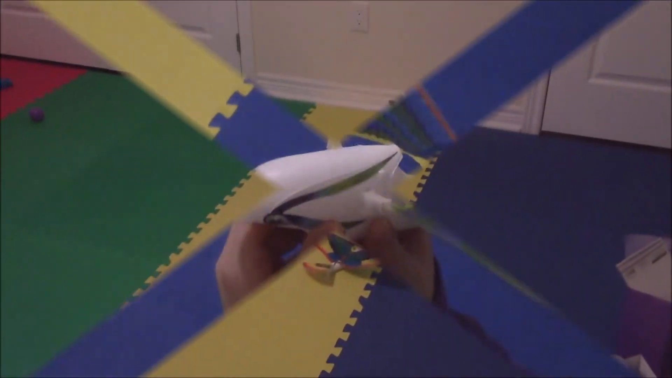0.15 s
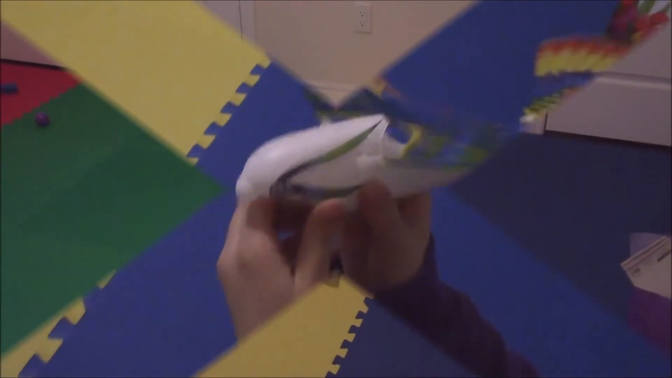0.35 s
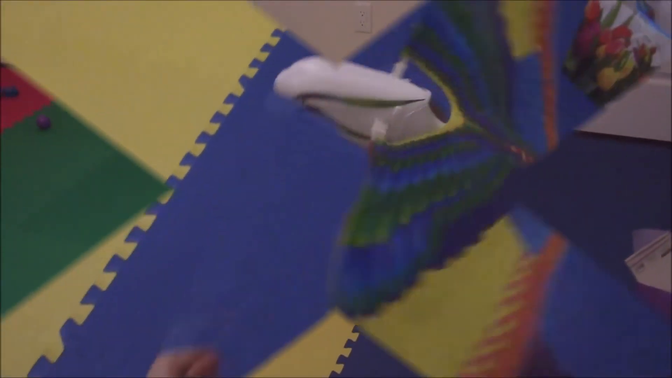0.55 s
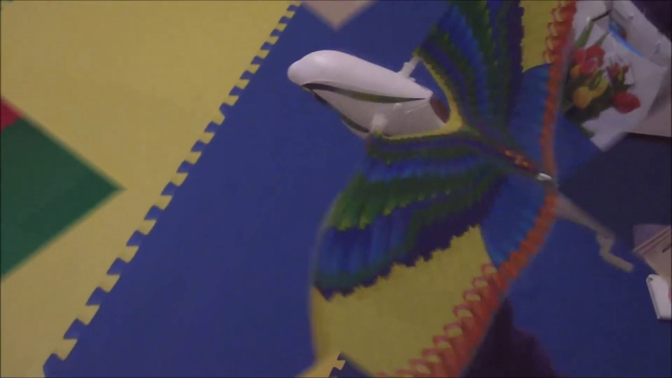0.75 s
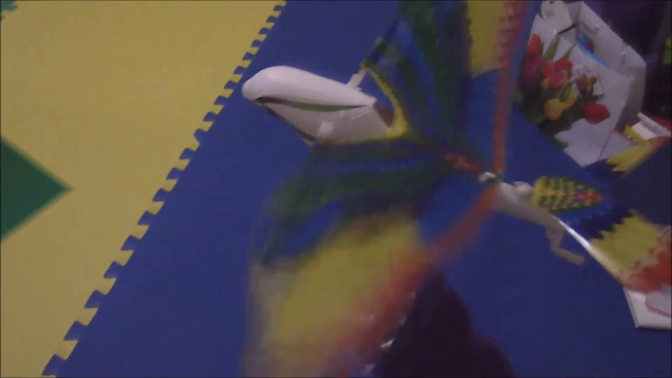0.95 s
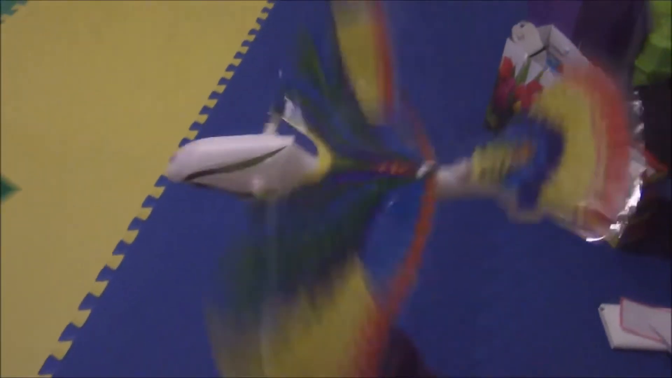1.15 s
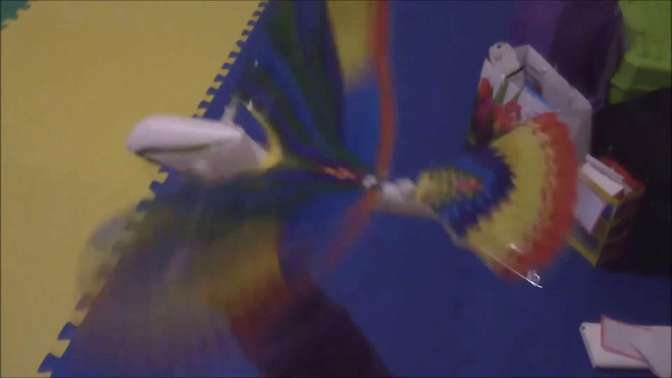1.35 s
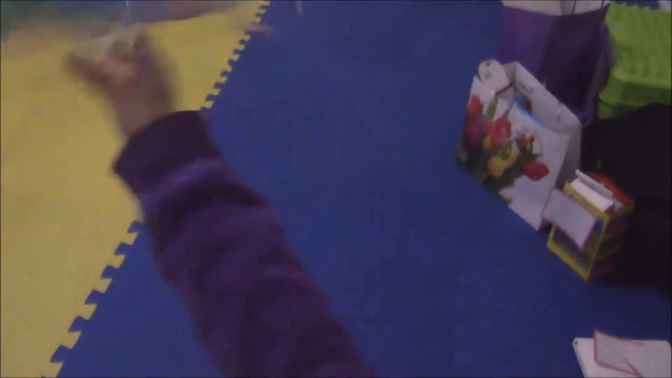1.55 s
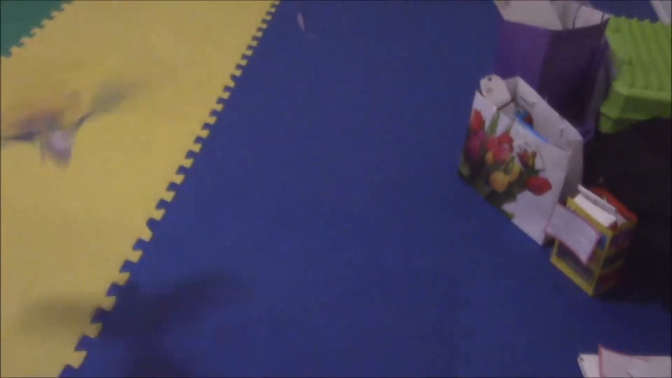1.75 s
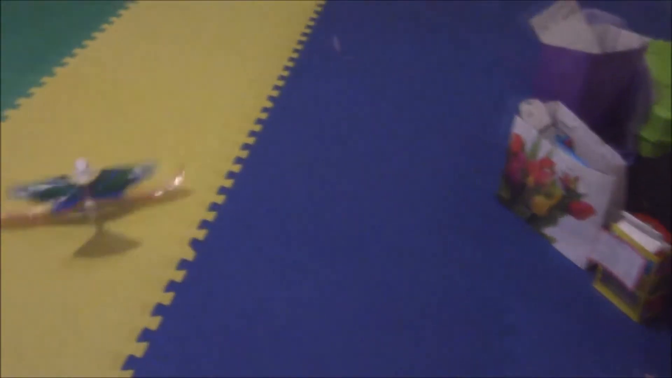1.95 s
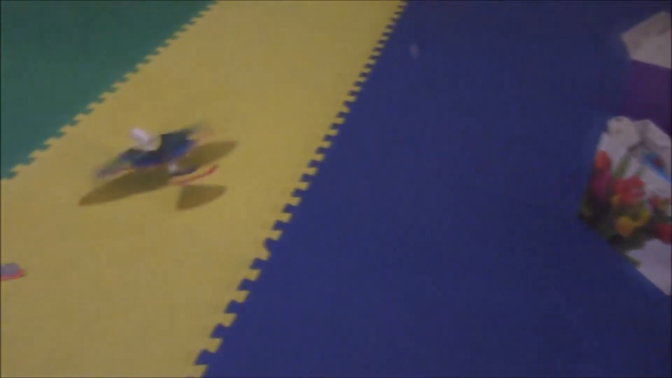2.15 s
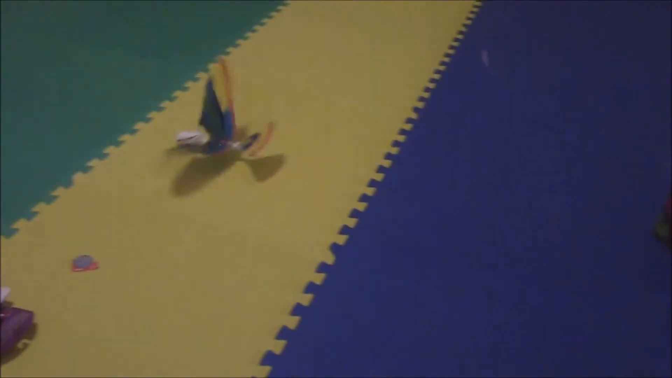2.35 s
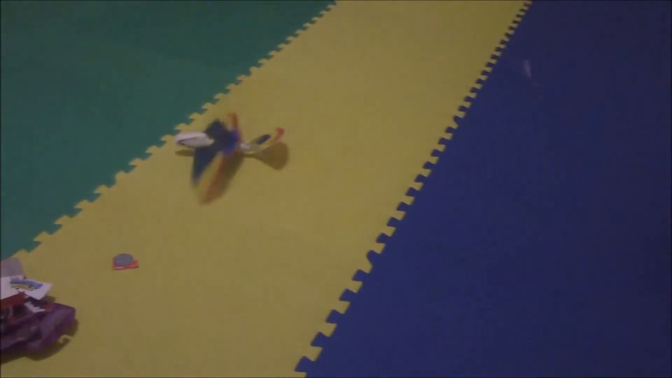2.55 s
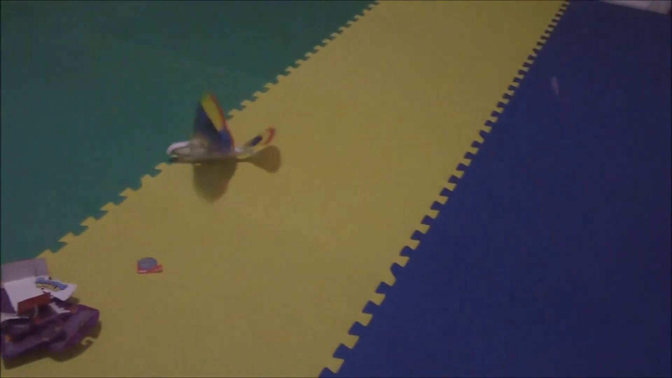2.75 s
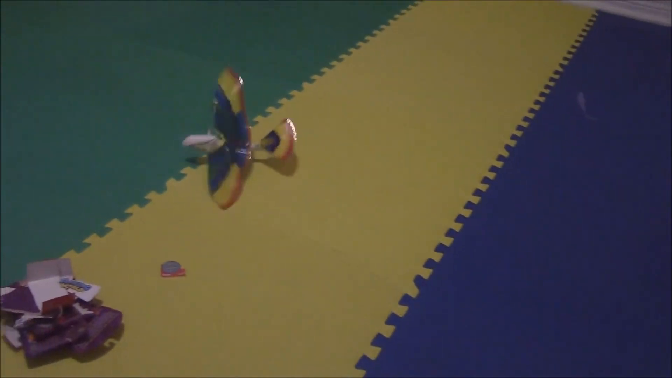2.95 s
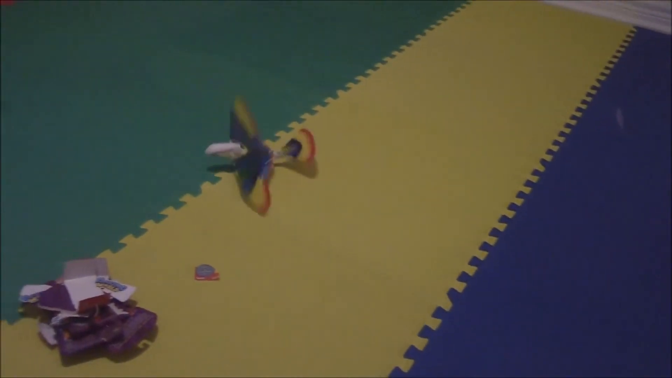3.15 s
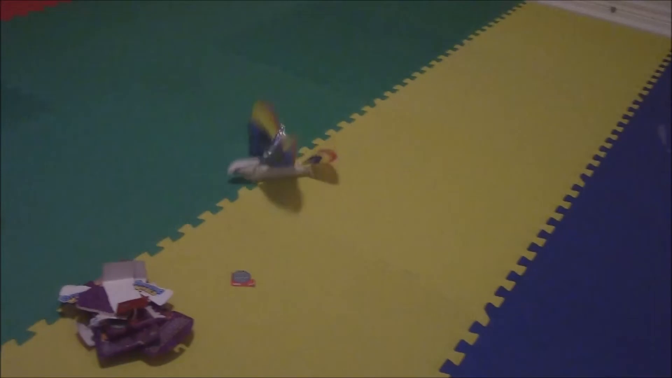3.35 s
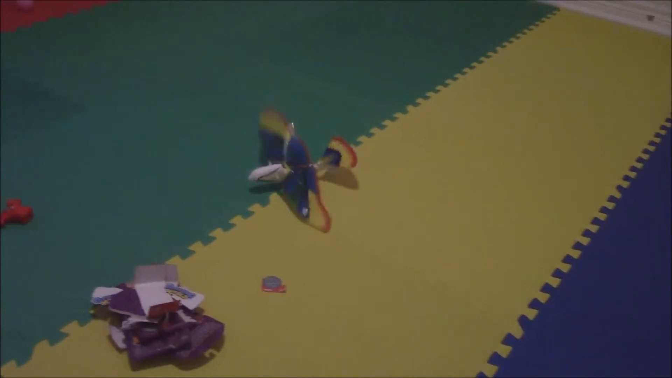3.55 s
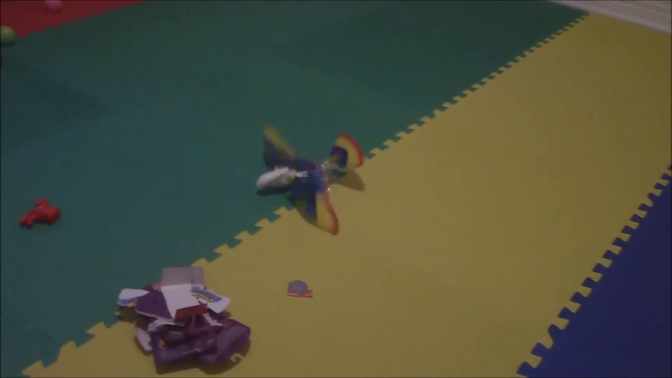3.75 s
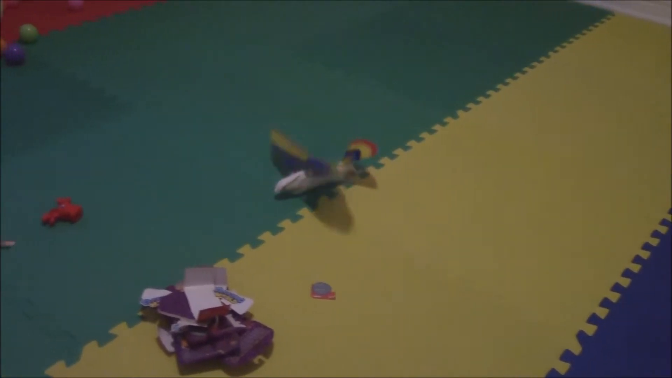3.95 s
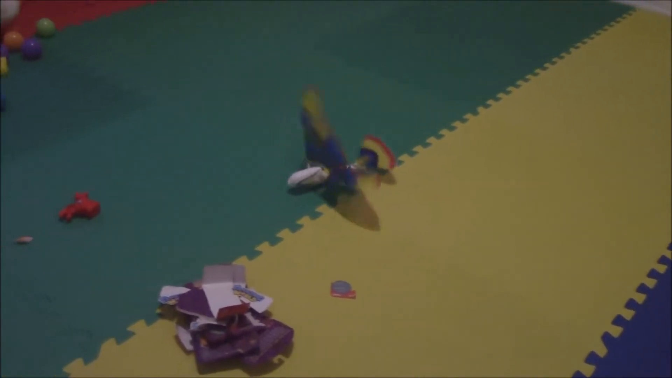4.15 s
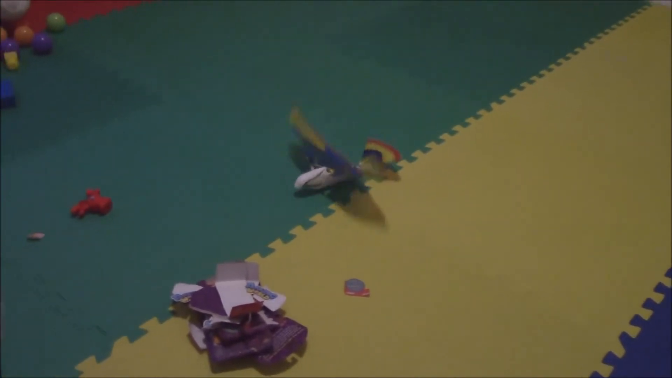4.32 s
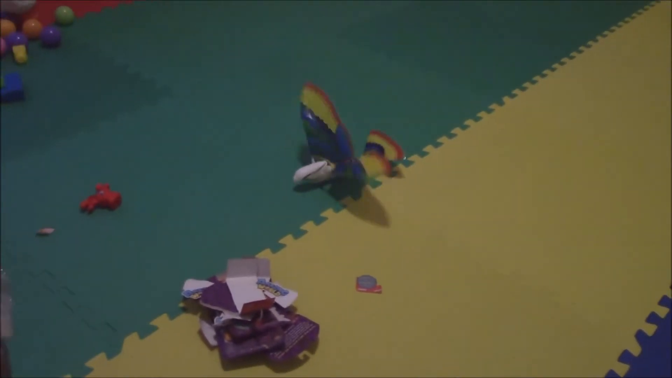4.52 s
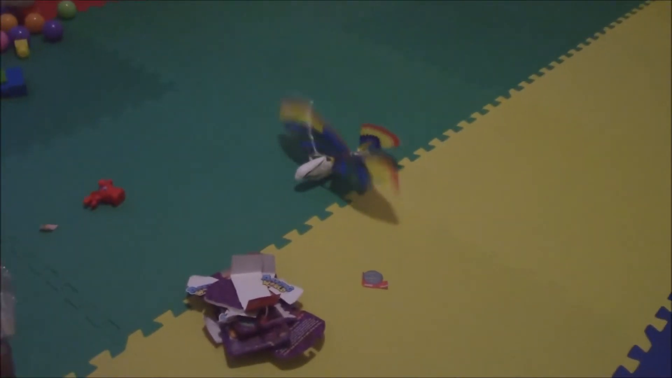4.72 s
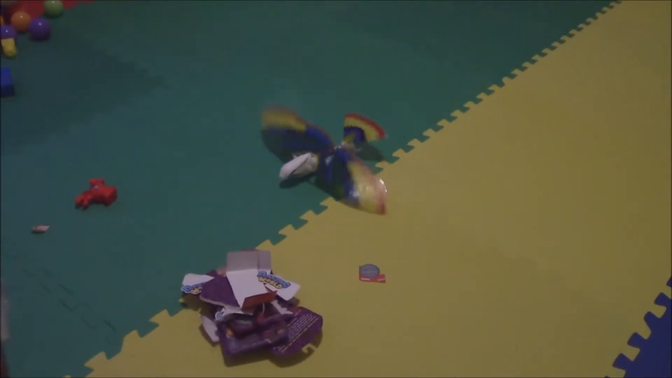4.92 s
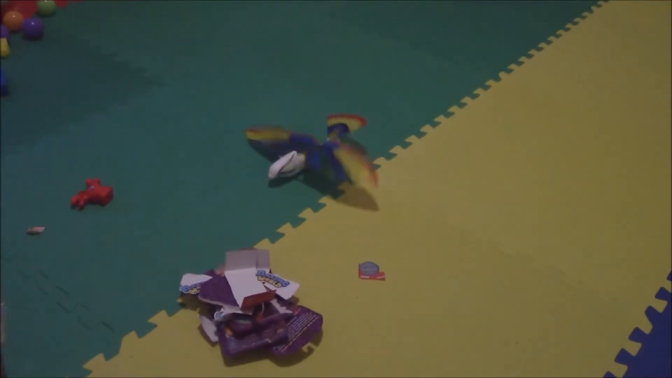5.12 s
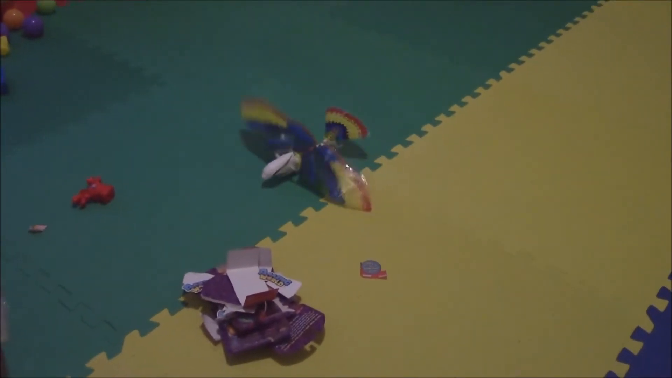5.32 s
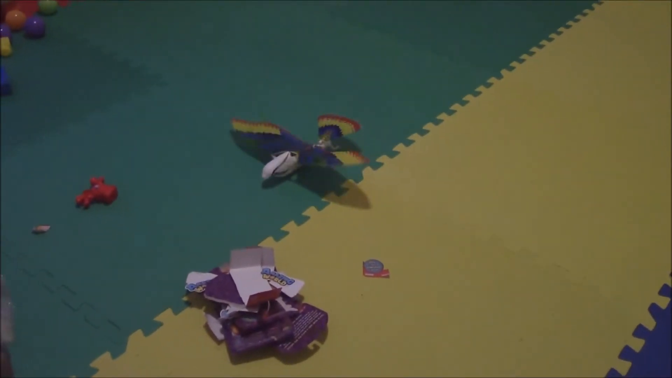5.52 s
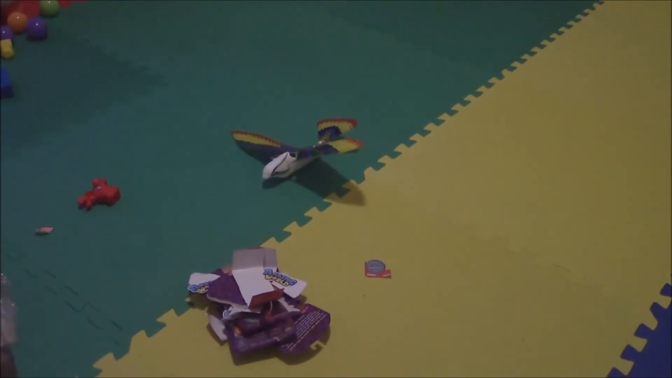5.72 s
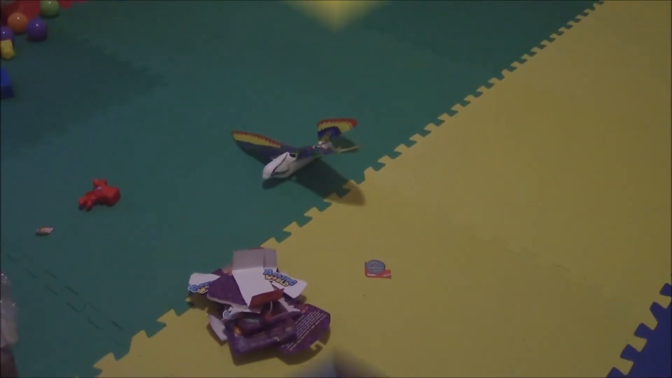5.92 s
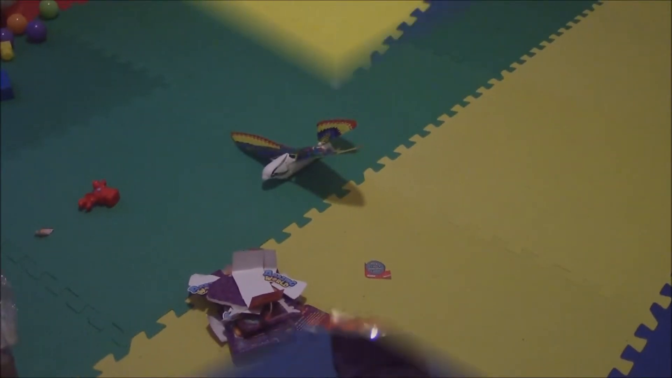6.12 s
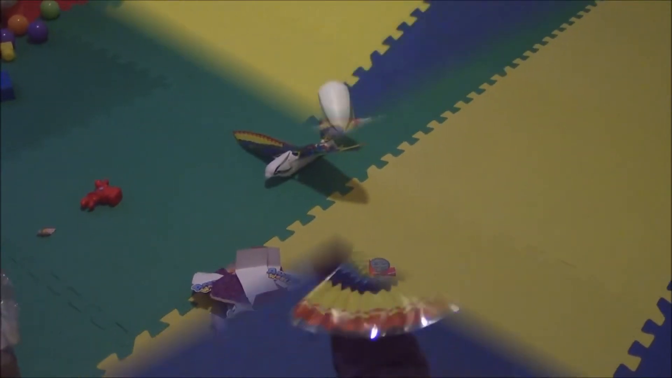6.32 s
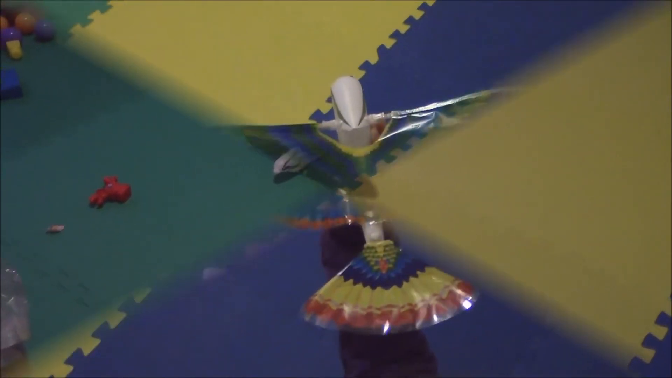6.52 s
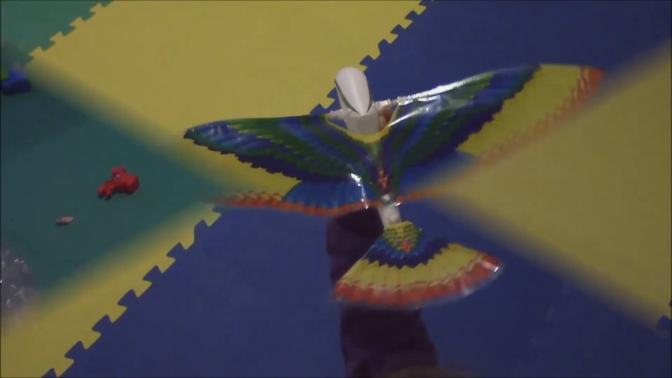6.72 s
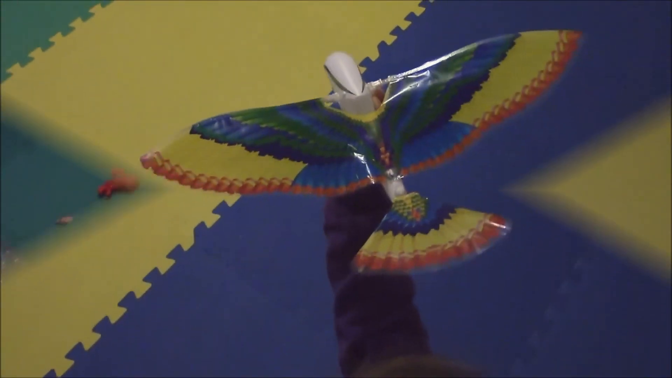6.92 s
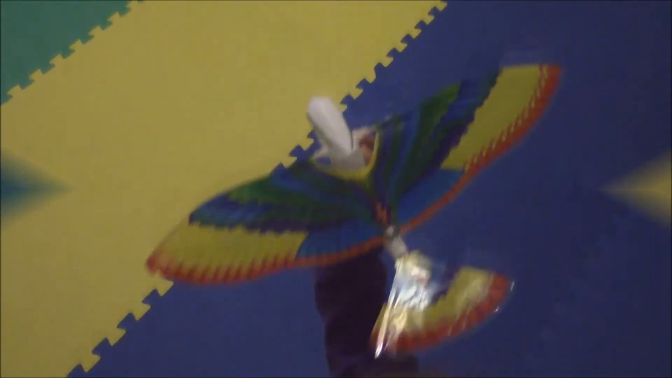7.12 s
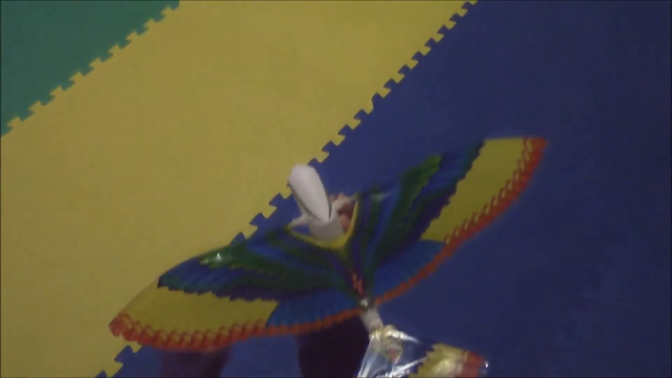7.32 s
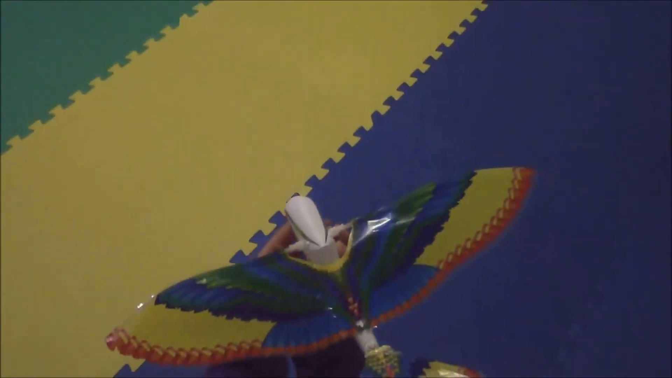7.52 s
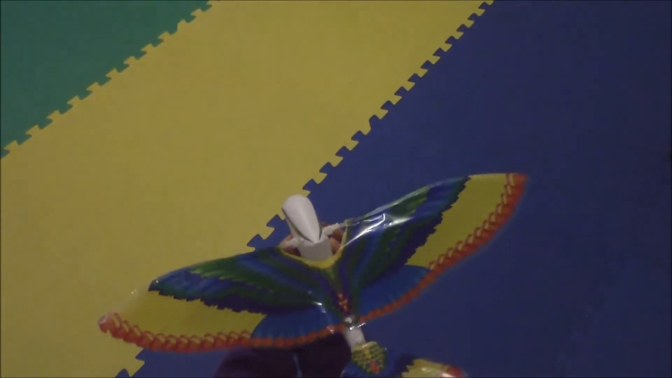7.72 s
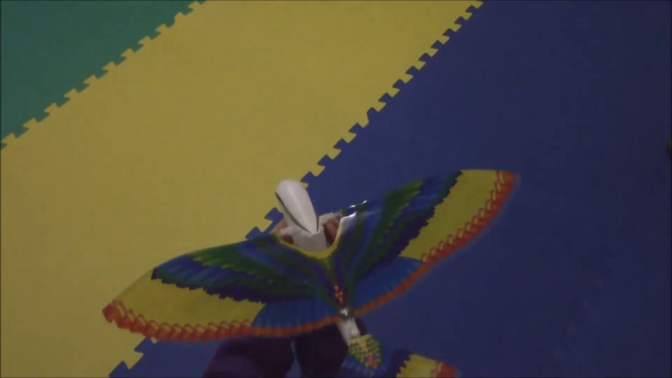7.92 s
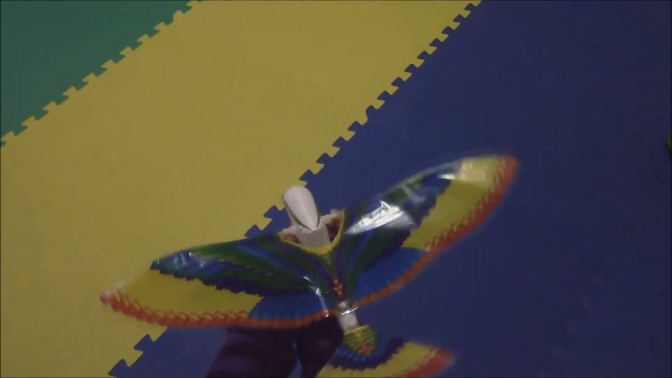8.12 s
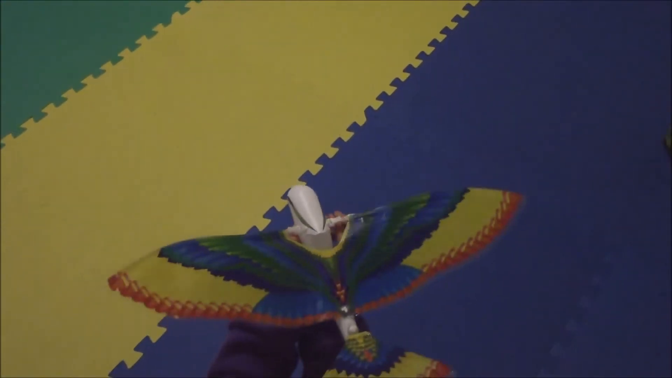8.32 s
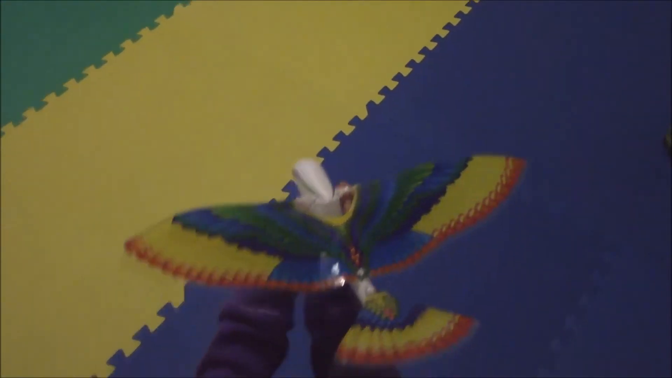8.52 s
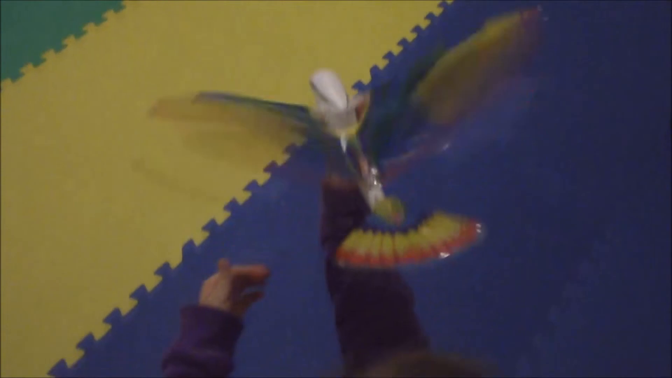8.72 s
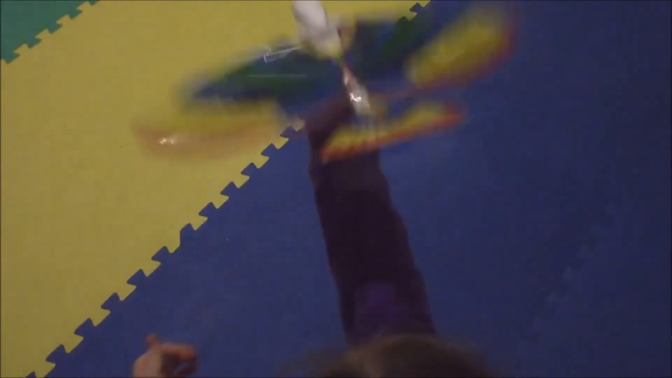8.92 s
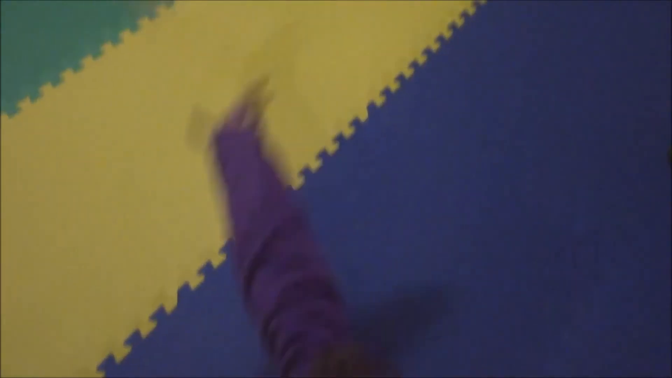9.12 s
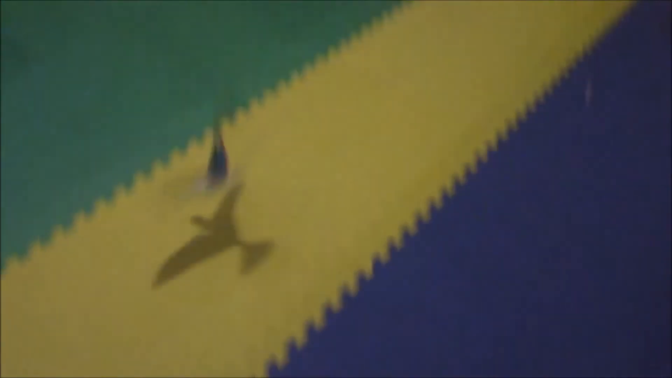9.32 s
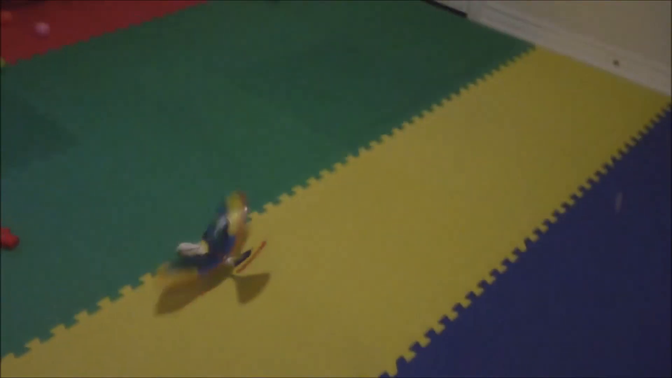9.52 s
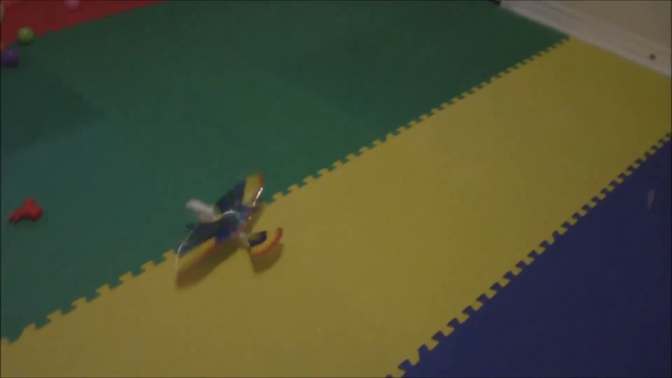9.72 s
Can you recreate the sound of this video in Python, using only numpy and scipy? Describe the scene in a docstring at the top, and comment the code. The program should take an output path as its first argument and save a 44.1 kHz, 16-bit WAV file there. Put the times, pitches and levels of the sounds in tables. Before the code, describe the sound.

Close to the microphone, thin plastic film crinkles in the hands. A rubber-driven toy bird is released and its wings clatter about twenty snaps a second, moving away and slowing to an uneven flapping on a foam mat. It stops; small plastic clicks and a sudden fading hiss follow. More light crinkling, then a second launch rattles off and is still flapping at the end. Bare, echoing room with soft hum.

```python
"""Bare, echoing playroom: a rubber-driven toy bird beats plastic-film wings in two flights.
Each stroke is a noise snap with a decaying sine ring, a knock of body resonances, a puff of air and rattling film.
Film crinkles (filtered crackle, noise creases) and is rubbed (bands of hiss); small plastic ticks are decaying modes.
Below lie a soft room hum (coloured noise) and a hiss that starts at once and fades."""
import sys
import numpy as np
from scipy import signal
from scipy.fft import rfft, irfft, next_fast_len
from scipy.io import wavfile
from scipy.ndimage import uniform_filter1d

SR = 44100
rng = np.random.default_rng(int(sys.argv[2]) if len(sys.argv) > 2 else 0)


def invert_db(x):
    """Field ratio 10**(x/20) for x, a level in decibels (scalar or array-like)."""
    u = np.asarray(x, float) / 20
    return 10 ** u


def master_out(mix):
    """Clip the mix to full scale and print it as 16-bit PCM to the path in sys.argv[1]."""
    frames = np.transpose(np.atleast_2d(mix))
    ceiling = np.clip(frames, -1, 1)
    pcm = np.round(ceiling * 32767).astype(np.int16)
    wavfile.write(sys.argv[1], SR, pcm)


N = 434826
T = np.arange(N) / SR

# room hum, stepwise: start_s, level_db, treble_db
HUM_STEPS = [(0, -42.5, 9.5), (1.002, -54, 8), (6.349, -40.5, 7.5)]
# hum spectrum: pitch_hz, level_db
HUM_SPECTRUM = [(70, -14.5), (140, -3), (250, 1), (500, -3.5), (1200, -16.5), (3300, -29), (7000, -44.5),
                (11000, -55)]
# room decay: pitch_hz, t60_s
ROOM_T60 = [(120, .2), (300, .58), (900, .95), (3200, .85), (6400, .74), (9500, .58), (15000, .35)]
# standing waves of the room: pitch_hz
ROOM_MODES_HZ = [150.3, 233.5, 295, 347.7, 417]
# stereo side of a sound, before its side level: pitch_hz, level_db
SIDE_SPECTRUM = [(40, -9.5), (150, -31), (2000, -25.5), (4000, -16), (8000, -12.5), (15000, -21)]
# soft rubbing near the bird: start_s, length_s, centre_hz, level_db
RUBS = [(8.09, 0.14, 1560, -43), (0.14, 0.21, 940, -43), (0.556, 0.076, 1020, -38)]
# small plastic ticks: start_s, level_db, left_minus_right_db, push_s
TICKS = [(5.913, -10.5, -4, 0.0021), (6.2634, -6.5, -5, 0.00021), (6.279, -11.5, 2, 0.0019),
         (6.542, -12.5, 3, 0.00041), (6.567, -7, 3, 0.00079)]
# modes of a tick: pitch_hz, level_db, t60_s
TICK_MODES = [(1530, 14, 0.012), (2560, 16.5, 0.012), (3580, 4.5, 0.0055), (4530, 12, 0.0056),
              (6500, 4, 0.0054)]
# bird held, idle crinkle: start_s, end_s, level_db
HELD = [(0, 0.974, -46), (7.023, 8.724, -50)]
# fingers squeeze the film: start_s, hold_s, level_db
SQUEEZES = [(0.384, 0.11, -33.5), (0.609, 0.012, -28), (7.14, 0.033, -40.5), (7.899, 0.015, -35),
            (8.229, 0.06, -37.5), (8.352, 0.04, -35), (8.484, 0.029, -40)]
# single film creases, faint to sharp: start_s, level_db
CREASES = [(0.3975, -21), (0.4226, -12.5), (0.4489, -14.5), (0.6419, -18), (0.6734, -8.5), (0.814, -29),
           (0.956, -49), (0.975, -39.5), (5.648, -58), (5.722, -37), (6.5886, -28), (7.156, -32),
           (7.928, -22.5), (7.455, -36), (7.868, -31), (8.265, -15), (8.337, -26), (8.622, -28),
           (8.494, -17.5), (7.35, -28.5)]
# crinkle spectrum: pitch_hz, level_db
CRINKLE_SPECTRUM = [(350, -34.5), (600, 3), (3630, 2), (5330, -4), (9360, -6.5), (12800, -21.5),
                    (16000, -34)]
# flights: release_s, mat_landing_s, turn_swap_after_landing
FLIGHTS = [(1.0, 1.7, 0), (8.75, 9.33, 1)]
# wing strokes, two alternating kinds, swapped after the second landing: start_s, snap_db
STROKES = [(1.007, 9), (1.029, -3), (1.062, 0), (1.0978, 0), (1.138, 6), (1.1824, 1), (1.2253, 3.5),
           (1.2699, 2.5), (1.316, 0), (1.3646, 0.5), (1.414, 2), (1.4653, 1.5), (1.5194, 0), (1.568, 0.5),
           (1.6187, 4.5), (1.671, -8.5), (1.7165, -2), (1.7732, -8), (1.817, -3), (1.8762, -8),
           (1.9186, -1), (1.9833, -7), (2.0433, -3.5), (2.099, -11), (2.1603, -3.5), (2.2198, -8),
           (2.2837, -3.5), (2.341, -10.5), (2.409, -0.5), (2.484, -12), (2.5438, -5.5), (2.618, -4),
           (2.6827, -2.5), (2.758, -11), (2.8236, 0), (2.901, -5.5), (2.966, 1), (3.0448, -8), (3.111, -1),
           (3.1852, -3.5), (3.245, 4.5), (3.327, -8), (3.3896, 0.5), (3.4694, -7), (3.5369, 1.5),
           (3.6323, -7.5), (3.703, -2.5), (3.794, -10.5), (3.8603, 0), (3.9554, -11.5), (4.0325, 0.5),
           (4.1397, -2.5), (4.211, -1), (4.3174, -2), (4.39, -1), (4.4783, -2.5), (4.5576, -1), (4.656, -5),
           (4.7311, 2), (4.8137, -6.5), (4.9049, -4.5), (4.9975, -3.5), (5.0963, -2), (5.2123, -9),
           (5.2972, -1.5), (5.416, -16.5), (8.756, -2.5), (8.7748, -1), (8.832, 2.5), (8.8962, -4.5),
           (8.9563, -2), (9.0267, 0), (9.0747, -2), (9.1365, 0), (9.19, -1), (9.2444, -1.5), (9.306, -9.5),
           (9.3525, -4.5), (9.427, -3.5), (9.4842, -3.5), (9.536, -4), (9.604, 1), (9.6688, 1.5),
           (9.733, 9), (9.8015, 6)]
# the bird as heard: time_s, stroke_force_db, nearness_db, hollow_level_db
PLACE = [(0.999, -17, -4.5, 6), (1.3, -20.5, 5, -14), (1.6, -22.5, 1.5, 4), (1.9, -16.5, -10.5, 2),
         (2.601, -16.5, -10.5, -2), (3.301, -16.5, -12.5, 1.5), (3.85, -14, -11.5, 4),
         (4.101, -15, -14.5, -8.5), (5.3, -14, -12.5, -1.5), (8.7, -14, 2, -13.5), (9.2, -11, -5.5, -8.5),
         (9.5, -9, -5.5, -6), (9.8, -12, -17, -4.5)]
# narrow resonances, drifting as the bird turns: time_s, lower_hz, upper_hz, lower_minus_upper_db
HOLLOWS = [(1.0, 790, 914, -3), (2.0, 730, 896, -9), (2.8, 685, 914, 1), (3.85, 650, 891, -8),
           (4.2, 643, 962, 1), (5.399, 700, 971, -3), (8.7, 760, 1049, 1.5), (9.798, 705, 1027, 2.5)]
# hollow body: pitch_hz, width_hz, level_db
BODY_MODES = [(461, 110, -12.5), (777, 303, -4), (1061, 237, -7.5), (1384, 180, -8), (2096, 780, -11.5)]
# body bumps the mat: start_s, level_db
BUMPS = [(9.414, 1), (9.623, 3)]
# film spectrum: pitch_hz, level_db
FILM_SPECTRUM = [(590, -27), (1000, 0), (1710, -9), (3050, -7.5), (5020, -9.5), (9940, -10), (13100, -14.5),
                 (16000, -33)]

MIC_HISS_DB = -24  # against the hum
WASH_AT_S, WASH_DB, WASH_DECAY_S = 6.349, -42.5, 0.81
EARLY_SHARE, LATE_DB = .3, 0.5  # fast part: share of t60; slow tail: level against it
NEAR_SIDE_DB = -7.5  # direct sound
TICK_BRIGHT = 0.49  # harder ticks ring more upper modes: dB per dB and octave
TICK_TAIL_DB, TICK_TAIL_S = -1.5, 0.0092
SQUEEZE_RISE_S, SQUEEZE_FALL_S = .02, .04
SMALL_CREASES_PER_S, SMALL_CREASE_DB = 45, 7
# film ring: downstrokes, free upstrokes, upstrokes damped by the mat
DOWN_HZ, UP_HZ, UP_MAT_HZ = 2136, 3076, 1840
FRESH_RISE, FRESH_S = .3, .09  # pitch rise as a share, its decay after release
RING_SCATTER = 0.11  # share of pitch
RING_S, UP_RING_S, FREE_RING_DB = .0013, .0018, 4  # free upstrokes ring longer and louder
SNAP_S, SNAP_DB, UP_SNAP_DB = .002, -9, -2
BRIGHT_SCATTER_DB = 2.5  # stroke to stroke
TREBLE_PER_NEAR_DB, TREBLE_DB = 0.19, 3  # a near bird is brighter
DOWN_KNOCK_DB = 1  # downstrokes in the air knock harder
PUFF_UP_DB = -5  # upstrokes push less air
SLAP_DB, SLAP_UP_DB, SLAP_S = -3, -2, 0.0012
PAPER_DB, PAPER_S = -25, 0.036  # rattly tail of a downstroke's slap
HOLLOW_WIDTH_HZ = 50
STROKE_HOLLOW_DB, STROKE_HOLLOW_S = -9.5, 0.069
THIRD_HOLLOW, THIRD_DB = 1.55, -8  # weaker resonance: multiple of the upper pitch, level
UP_FILM_DB = 1.5  # upstrokes rustle more
SWISH_HZ, SWISH_WIDTH_HZ, SWISH_DB, SWISH_PER_NEAR_DB = 12500, 8000, -6, 0.5
SWISH_LEAD_S, SWISH_LEAD_DB, SWISH_S, SWISH_DOWN_DB = .013, -3, .012, -5
SWEEP_DB, SWEEP_S = -10, .05  # hiss lingering between strokes


def colour(x, points):
    """Filter by a curve of (Hz, dB) points."""
    hz, db = np.transpose(points)
    f = np.maximum(np.fft.rfftfreq(x.shape[-1], 1 / SR), 1)
    return irfft(rfft(x) * invert_db(np.interp(np.log(f), np.log(hz), db)), x.shape[-1])


def unit(x):
    """Scale to rms 1."""
    return x / np.sqrt(np.mean(x ** 2))


def ring(x, hz, width_hz):
    """One resonance, gain 1 at its centre."""
    return signal.lfilter(*signal.iirpeak(hz, hz / width_hz, fs=SR), x)


def noise():
    """White noise of the full length."""
    return rng.standard_normal(N)


def add(track, s, sound):
    """Lay a sound into a track at a time."""
    i = int(s * SR)
    track[..., i:i + sound.shape[-1]] += sound[..., :N - i]


def bursts(times, gains, decay_s):
    """Envelope that jumps at each time and dies away exponentially."""
    kicks = np.bincount((np.asarray(times) * SR).astype(int), gains, N)
    return signal.lfilter([1], [1, -np.exp(-1 / (decay_s * SR))], kicks)


def delayed_mean(x, size):
    """Moving mean over the past, so onsets are never early."""
    return uniform_filter1d(x, size=size, origin=size // 2 - 1)


def walk(rate):
    """Random levels held 1 / rate s and smoothed; spread near 1."""
    k = int(SR / rate)
    held = np.repeat(rng.standard_normal(N // k + 1), k)
    return 1.3 * uniform_filter1d(uniform_filter1d(held, k), k)[:N]


def crackle(rate, spread_db):
    """Sparse tiny clicks of very uneven size."""
    size = invert_db(spread_db * rng.exponential(size=N))
    return unit((rng.random(N) < rate / SR) * size * noise())


def wide(paint, side_db=0):
    """Left and right of a diffuse noise: a common mid and a side."""
    mid, side = unit(paint(rng.standard_normal((2, N))))
    side = invert_db(side_db) * colour(side, SIDE_SPECTRUM)
    return np.array([mid + side, mid - side])


def aside(x):
    """Left and right of a direct sound: short first reflections differ a little between them."""
    spread = rng.standard_normal(256) * np.exp(-T[:256] / .0015)
    reflected = signal.fftconvolve(x, spread / np.linalg.norm(spread))[:N]
    side = invert_db(NEAR_SIDE_DB) * colour(reflected, SIDE_SPECTRUM)
    return np.array([x + side, x - side])


def room(power, paint):
    """Noise whose bands follow stored power, each fading at its own t60."""
    hz, t60 = np.transpose(ROOM_T60)
    size = next_fast_len(N)
    field, out = rfft(wide(paint), size), 0
    octave = np.log2(np.fft.rfftfreq(size, 1 / SR) + 1)
    power = delayed_mean(power, 256)  # first walls answer over a few ms
    for share, s in zip(np.eye(len(hz)), t60):
        # overlapping bands that sum to 1
        band = irfft(field * np.interp(octave, np.log2(hz), share), size)[:, :N]
        keep = np.exp(-2 * np.log(1000) / (SR * s))
        early = signal.lfilter([1], [1, -keep ** (1 / EARLY_SHARE)], power)
        late = invert_db(2 * LATE_DB) * signal.lfilter([1], [1, -keep], power)
        out = out + band * np.sqrt(np.maximum(early + late, 0))
    return out


def hum():
    """Soft broad noise of the house over microphone hiss; level and treble step."""
    s, level_db, treble_db = np.transpose(HUM_STEPS)
    step = np.searchsorted(s, T, "right") - 1
    both = wide(lambda x: colour(x, HUM_SPECTRUM), side_db=16.0)
    low = signal.sosfilt(signal.butter(1, 900, fs=SR, output="sos"), both)
    hiss = invert_db(MIC_HISS_DB) * wide(lambda x: ring(x, 9000, 12000), side_db=2.0)
    return invert_db(level_db[step]) * (low + invert_db(treble_db[step]) * (both - low) + hiss)


def wash():
    """A broad smooth hiss that starts at once and fades."""
    shape = invert_db(WASH_DB) * bursts([WASH_AT_S], None, WASH_DECAY_S)
    return shape * wide(lambda x: ring(ring(x, 2600, 5300), 2600, 5000))


def rubs():
    """Soft bands of hiss that swell and fade."""
    out = 0
    for s, length_s, hz, db in RUBS:
        shape = np.clip(np.minimum(T - s, (s + length_s - T) / 3) / .02, 0, 1)
        band = ring(ring(noise(), hz, 0.38 * hz), hz, 0.38 * hz)
        out = out + invert_db(db) * shape * unit(band)
    return aside(out)


def ticks():
    """Plastic clicks: a dry crack, a few modes and a rough tail; a longer push is duller."""
    out, t = np.zeros((2, N)), T[:2048]
    for s, db, pan_db, push_s in TICKS:
        grain = rng.standard_normal(len(t))
        tick = 0
        for (hz, mode_db, t60), phase in zip(TICK_MODES, grain):
            gain = invert_db(mode_db + TICK_BRIGHT * (db + 14) * np.log2(hz / 2000))
            tick = tick + gain * np.sin(2 * np.pi * hz * t + phase) * np.exp(-np.log(1000) * t / t60)
        crack = invert_db(11.0) * np.exp(-t / 0.001)
        tail = invert_db(TICK_TAIL_DB) * np.exp(-t / TICK_TAIL_S)
        tick = tick + ring(grain, 1430, 2900) * (crack + tail)
        soft = signal.butter(1, min(1 / push_s, .4 * SR), fs=SR)
        tick = signal.lfilter(*soft, tick * (1 - np.exp(-t / 0.000079)))
        pan = np.array([[pan_db], [-pan_db]]) / 2
        add(out, s, invert_db(db - 21.0 + pan) * tick)
    return out


def crinkles():
    """Film crinkles, mostly in the hand, a few as the bird settles: patchy crackle, creases, echo."""
    gain = sum(invert_db(db) * ((T >= a) & (T < b)) for a, b, db in HELD)
    for s, hold_s, db in SQUEEZES:
        rise = np.clip((T - s) / SQUEEZE_RISE_S, 0, 1)
        gain = gain + invert_db(db) * rise * np.exp(-np.maximum(T - s - hold_s, 0) / SQUEEZE_FALL_S)
    out = gain * unit(colour(crackle(7000, 1.8) * invert_db(4 * walk(90)), CRINKLE_SPECTRUM))
    # small creases by chance
    small_s = T[rng.random(N) < SMALL_CREASES_PER_S / SR]
    small = bursts(small_s, None, 0.0032) * invert_db(SMALL_CREASE_DB) * invert_db(5 * walk(60))
    out += ring(gain * small * noise(), 6500, 3500)
    t = T[:512]
    for s, db in CREASES:
        grain = rng.standard_normal(len(t))
        hz = 8000 * invert_db(1.5 * grain[-1])  # each crease has its own pitch
        add(out, s, invert_db(db + 1) * ring(ring(grain * np.exp(-t / .0018), hz, 8000), hz, 8000))
    return aside(out) + invert_db(-41.0) * room(out ** 2, lambda x: colour(x, CRINKLE_SPECTRUM))


def body(x):
    """Hollow body: parallel resonances of alternating sign."""
    return sum((-1) ** k * invert_db(db) * ring(x, hz, w) for k, (hz, w, db) in enumerate(BODY_MODES))


def air(x):
    """Dull thump of air pushed by a wing."""
    return ring(ring(x, 270, 570), 270, 570)


def boom(x):
    """The thump as the room's standing waves hold it."""
    return air(x) + invert_db(5) * sum(ring(x, hz, 12) for hz in ROOM_MODES_HZ)


def hollow(x, hz):
    """Narrow resonance of movable pitch: low noise shifted up to it."""
    lowpass = signal.butter(2, HOLLOW_WIDTH_HZ / 2, fs=SR, output="sos")
    lows = signal.sosfilt(lowpass, x + 1j * x[..., ::-1])
    return np.real(lows * np.exp(2j * np.pi * np.cumsum(hz) / SR))


def flight_of(s):
    """Release, landing and turn swap of the flight each stroke belongs to."""
    table = np.transpose(FLIGHTS)
    return table[:, np.searchsorted(table[0], s) - 1]


def upstrokes(s):
    """True for each upstroke; the alternation of the two stroke sounds swaps after the second landing."""
    _, lands, swap = flight_of(s)
    return (np.arange(len(s)) + swap * (s >= lands)) % 2 == 1


def film_rings(s):
    """Ring pitch of each stroke, higher on freshly wound rubber; True while airborne."""
    released, lands, _ = flight_of(s)
    up, flying = upstrokes(s), s < lands
    hz = np.where(up, np.where(flying, UP_HZ, UP_MAT_HZ), DOWN_HZ)
    hz = hz * (1 + FRESH_RISE * np.exp(-(s - released) / FRESH_S))
    scatter = np.where(up & flying, RING_SCATTER / 3, RING_SCATTER)
    return hz * (1 + scatter * rng.standard_normal(len(s))), flying


def film_snap(s, snap_db, up, free, film_hz, treble_db):
    """Film pulled taut: a noise burst plus a short decaying sine."""
    burst_db = snap_db + SNAP_DB + UP_SNAP_DB * up + BRIGHT_SCATTER_DB * rng.standard_normal(len(s))
    film = ring(unit(colour(noise(), FILM_SPECTRUM)), 7400, 13000)
    snap = film * bursts(s, invert_db(burst_db), SNAP_S) * invert_db(2.27 * treble_db)
    t = T[:1024]
    decays_s = np.where(free, UP_RING_S, RING_S)
    for at_s, db, hz, decay_s in zip(s, snap_db + FREE_RING_DB * free, film_hz, decays_s):
        add(snap, at_s, invert_db(db - 6.5) * np.sin(2 * np.pi * hz * t) * np.exp(-t / decay_s))
    return snap


def body_knock(s, snap_db, air_down):
    """Blows of the strokes and bumps on the mat excite the body."""
    # the blow reaches the body a moment after the snap
    blow = bursts(s + 0.0012, invert_db(snap_db + 12.0 + DOWN_KNOCK_DB * air_down), 0.0015)
    bump_s, bump_db = np.transpose(BUMPS)
    bump = bursts(bump_s, invert_db(bump_db + 7.5), 0.0057)
    return body(noise() * blow) + body(noise() * bump)


def plastic_slap(s, snap_db, up):
    """Broad plastic slap; downstrokes leave a rattly tail."""
    shape = bursts(s, invert_db(snap_db + SLAP_DB + SLAP_UP_DB * up), SLAP_S)
    rattly = crackle(900, 4) * bursts(s[~up], invert_db(snap_db[~up] + PAPER_DB), PAPER_S)
    return ring(noise() * shape + rattly, 1800, 1600)


def hollow_ring(s, knock_db, up, hollow_db, lower_hz, upper_hz, lower_db):
    """Downstrokes ring the lower narrow resonance, upstrokes the upper."""
    uneven_db = 3 * rng.standard_normal(len(s))
    out = 0
    for turn, hz, db in zip((~up, up), (lower_hz, upper_hz), (lower_db, 0)):
        shape = bursts(s[turn], invert_db(knock_db[turn] + uneven_db[turn]), STROKE_HOLLOW_S)
        shape = shape * invert_db(hollow_db + db + STROKE_HOLLOW_DB)
        out = out + unit(hollow(noise(), hz)) * delayed_mean(shape, 256)
    return out


def swish(s, db, up):
    """Airy hiss: rises ahead of an upstroke's snap, trails every stroke, lingers through the sweep."""
    led = up & (np.diff(s, prepend=0) < .5)  # a wing at rest has no run-up
    trail = bursts(s, invert_db(db + SWISH_DOWN_DB * ~up), SWISH_S)
    lead = bursts(s[led] - SWISH_LEAD_S, invert_db(db[led] + SWISH_LEAD_DB), SWISH_S)
    sweep = bursts(s, invert_db(db + SWEEP_DB), SWEEP_S)
    shape = delayed_mean(trail + lead, 128) + delayed_mean(sweep, 2048)
    return unit(ring(crackle(6000, 1.7), SWISH_HZ, SWISH_WIDTH_HZ)) * shape


def film_rattle(s, knock_db, up, puff_db):
    """Loose film crackles on through the stroke, with its swish."""
    shape = bursts(s, invert_db(knock_db - 7.0 + UP_FILM_DB * (2 * up - 1)), 0.013)
    loose = unit(colour(crackle(2500, 2.8), FILM_SPECTRUM)) * shape
    return loose + invert_db(SWISH_DB + SWISH_PER_NEAR_DB * puff_db) * swish(s, knock_db, up)


def wing_echo(s, knock_db, up, puff_db, treble_db, hollow_db, lower_hz, upper_hz, lower_db):
    """Room answer to the power of knock, puff, film and narrow resonances."""
    def hollows(x):
        """Three resonances; the rolled noise makes the lower one independent."""
        lower = invert_db(lower_db) * hollow(np.roll(x, SR, axis=1), lower_hz)
        return hollow(x, upper_hz) + lower + invert_db(THIRD_DB) * hollow(x, THIRD_HOLLOW * upper_hz)

    knocks = bursts(s, invert_db(2 * knock_db), 0.0027)
    puffs = bursts(s, invert_db(2 * (knock_db + PUFF_UP_DB * up)), 0.0032) * invert_db(2 * puff_db + 2)
    films = bursts(s, invert_db(2 * (knock_db + UP_FILM_DB * (up - 2.0))), 0.0031) * invert_db(2 * treble_db)
    echo = invert_db(-27.5) * room(knocks, body)
    echo += invert_db(-27.0) * room(puffs, boom)
    echo += invert_db(-25.0) * room(films, lambda x: colour(x, FILM_SPECTRUM))
    echo += invert_db(-30.5) * room(knocks * invert_db(2 * hollow_db), hollows)
    return echo


def wings():
    """All wing strokes: snap, slap, knock, puff, rattling film and their echo."""
    s, snap_db = np.transpose(STROKES)
    film_hz, flying = film_rings(s)
    up = upstrokes(s)
    at_s, *columns = np.transpose(PLACE)
    force_db, puff_db, hollow_db = (np.interp(T, at_s, c) for c in columns)
    treble_db = TREBLE_DB + TREBLE_PER_NEAR_DB * puff_db
    at_s, *columns = np.transpose(HOLLOWS)
    lower_hz, upper_hz, lower_db = (np.interp(T, at_s, c) for c in columns)
    # strokes that snap harder also knock a little harder
    knock_db = force_db[(s * SR).astype(int)] + 0.36 * snap_db
    snap = film_snap(s, snap_db, up, up & flying, film_hz, treble_db)
    knock = body_knock(s, snap_db, flying & ~up)
    knock = knock + hollow_ring(s, knock_db, up, hollow_db, lower_hz, upper_hz, lower_db)
    puff = invert_db(puff_db + 13) * air(noise() * bursts(s, invert_db(knock_db + PUFF_UP_DB * up), 0.0023))
    slap = plastic_slap(s, snap_db, up)
    rattle = film_rattle(s, knock_db, up, puff_db)
    echo = wing_echo(s, knock_db, up, puff_db, treble_db, hollow_db, lower_hz, upper_hz, lower_db)
    # single strong reflections and the swinging wings make the echo lumpy
    lumps = invert_db(1.3 * walk(110))
    whole = aside(snap + slap + knock + puff + invert_db(treble_db) * rattle * lumps) + echo * lumps
    # small wings give no deep bass
    return signal.sosfilt(signal.butter(4, 155, "high", fs=SR, output="sos"), whole)


def scene():
    """Hum, fading hiss, rubs, ticks, crinkles and wings."""
    return hum() + wash() + rubs() + ticks() + crinkles() + wings()


def roll_off(x):
    """The treble ends steeply here."""
    return signal.sosfilt(signal.butter(12, 16450, fs=SR, output="sos"), x)


def record(dry):
    """Loudest peaks are rounded, the top and deep bass are cut."""
    rounded = np.tanh(1.025 * dry) / 1.235
    x = signal.sosfilt(signal.ellip(8, .2, 70, 15750, fs=SR, output="sos"), rounded)
    x = signal.sosfilt(signal.butter(2, 75, "high", fs=SR, output="sos"), x)
    return roll_off(x)


dry = scene()
out = record(dry)
master_out(out)
```